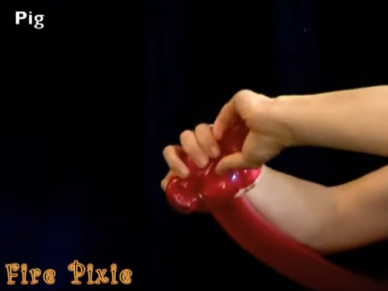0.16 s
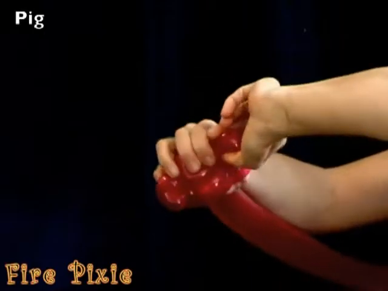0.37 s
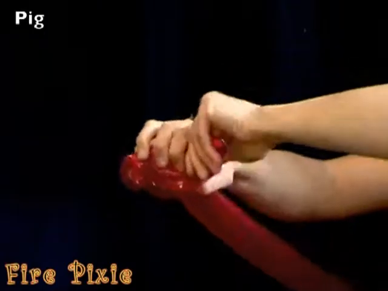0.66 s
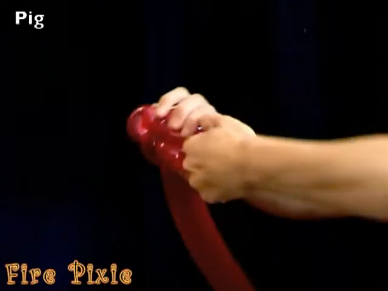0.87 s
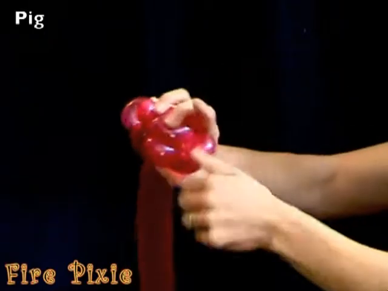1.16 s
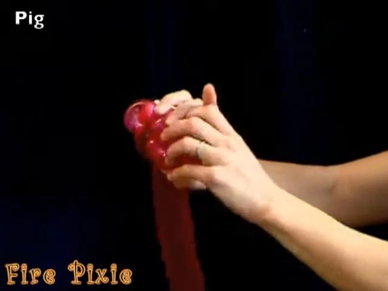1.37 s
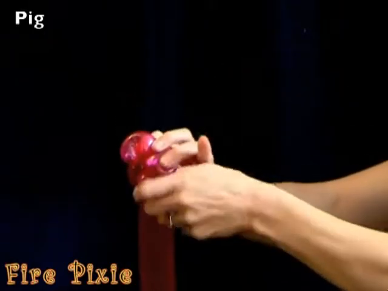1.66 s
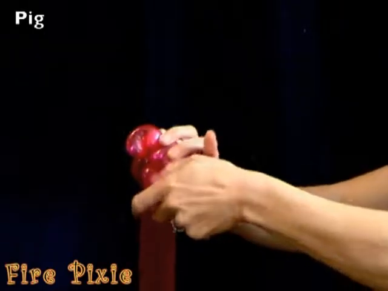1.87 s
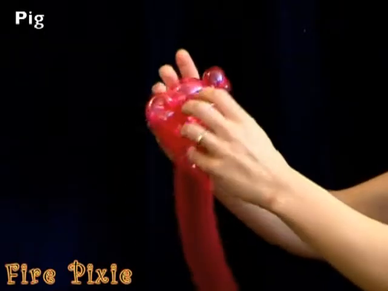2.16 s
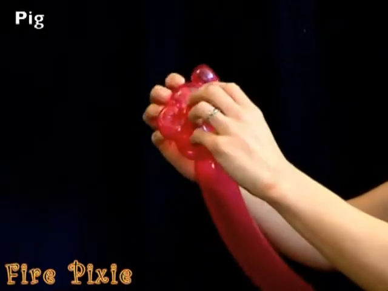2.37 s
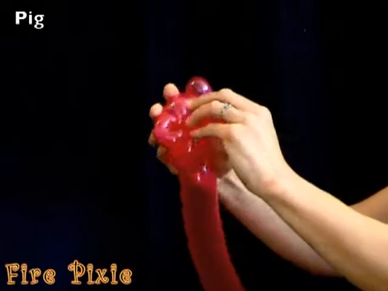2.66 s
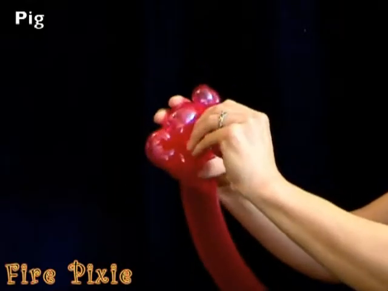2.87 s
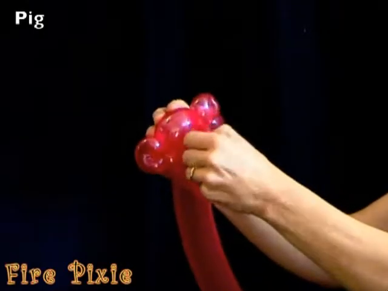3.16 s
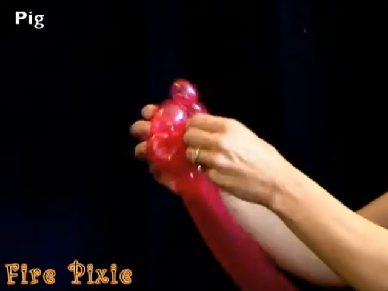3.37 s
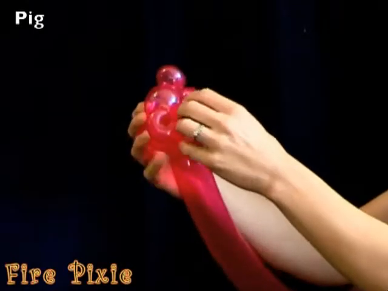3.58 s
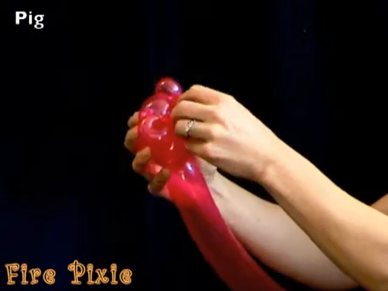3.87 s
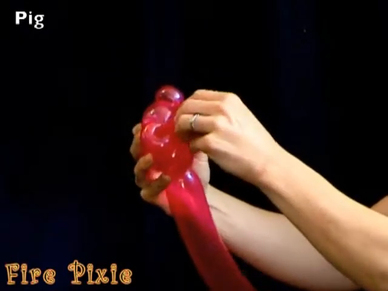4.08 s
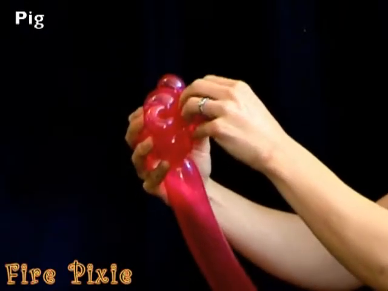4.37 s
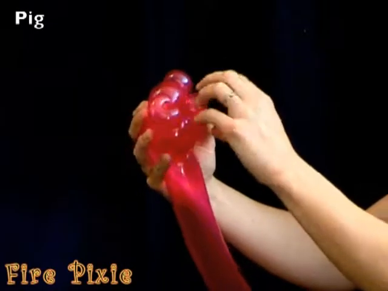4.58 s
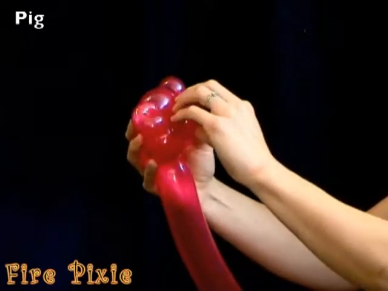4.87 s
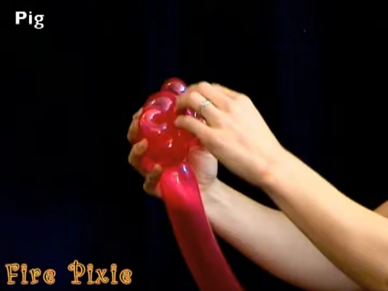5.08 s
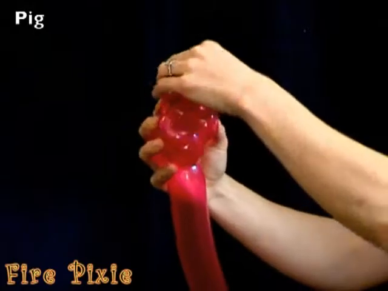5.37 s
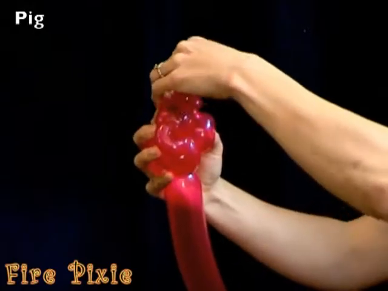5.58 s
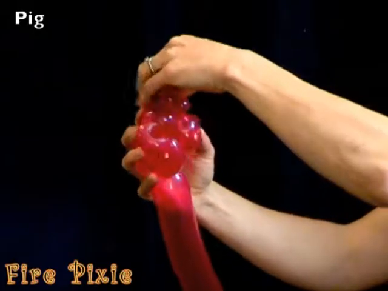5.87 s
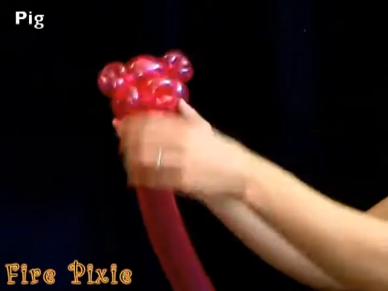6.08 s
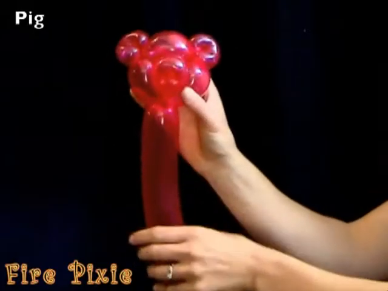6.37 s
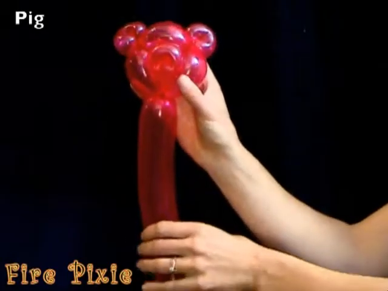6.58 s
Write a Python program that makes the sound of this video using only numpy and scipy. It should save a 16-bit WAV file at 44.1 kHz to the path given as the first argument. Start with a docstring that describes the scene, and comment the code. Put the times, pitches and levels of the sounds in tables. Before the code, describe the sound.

A taut latex balloon is twisted by hand, very close, in a small quiet room with a short reverberant tail and faint low room tone. From 0 to 1 s, rubbing comes in quick overlapping strokes, crackly and bright, with hollow bubble thuds around 0.2 and 0.8 and a cluster of hard snaps near 0.95. A tiny creak follows at 1.0, then lighter rubbing with isolated strong snaps around 1.3, 1.6, 1.8 and 2.15. It quiets around 2.3, then swells into dense rubbing and rapid snaps at 2.9-3.2, followed by short stuttering creaks to 3.5. From 3.9 to 5.1, rubbing alternates with faint creaks, with a sharp snap and thud near 4.15. A stroke at 5.4 leads into a thick snapping flurry at 5.5-5.8, capped by the loudest crack at 5.82. Afterwards only weak rubs and ticks remain, with a small bump and snap at 6.56.

```python
"""Stick-slip friction on a latex balloon

Fingers twist a balloon close by in a small quiet room. The rubber sticks and lets go in sharp
snaps (spiked noise bursts) and short creaks (rows of near-even slips) over a crackle of dense
small slips. Squeezed bubbles thud (damped tones with noise puffs). A short tail of random-sign
taps and a faint room tone (coloured noise) surround the balloon.
"""
import sys
import numpy as np
from scipy import signal
from scipy.fft import rfft, irfft, next_fast_len
from scipy.io import wavfile
from scipy.ndimage import uniform_filter1d

SR = 44100
rng = np.random.default_rng(int(sys.argv[2]) if len(sys.argv) > 2 else 0)


def persist_wave(psi):
    """Save psi, clipped to +-1, as 16-bit WAV."""
    counts = np.round(np.clip(psi, -1, 1) * 32767).astype(np.int16)
    wavfile.write(sys.argv[1], SR, np.atleast_2d(counts).T)


N = 296352  # length in samples


def amp(db):
    """Decibel law: the amplitude gain of a level in dB."""
    return 10 ** (np.asarray(db) / 20)


def evened(x):
    """Power normalisation: scales a signal to rms 1."""
    return x / np.sqrt(np.mean(x ** 2) + 1e-20)


def read(points, hz):
    """Logarithmic frequency scale: interpolates a table evenly per octave."""
    f, value = np.transpose(points)
    return np.interp(np.log(hz + 1), np.log(f + 1), value)


def coloured(x, points):
    """Linear filtering: weights the spectrum of a signal by a table of levels."""
    length = x.shape[-1]
    size = next_fast_len(length)
    gain = amp(read(points, np.fft.rfftfreq(size, 1 / SR)))
    return irfft(rfft(x, size) * gain, size)[..., :length]


def add(mix, s, sound):
    """Superposition: adds a sound into the mix at time s in seconds."""
    part = mix[max(round(s * SR), 0):][:len(sound)]
    part += sound[:len(part)]


# Faint room tone, spectral shape only: [f/Hz, level/dB]
ROOM_TONE = [(20, -41), (60, 0.5), (110, -6), (220, -6), (500, -9), (1000, -55), (6000, -75.5),
             (16000, -50)]
ROOM_TONE_DB = -65  # rms


def room_tone():
    """Stationary noise: a steady random signal is described by its spectrum and rms level."""
    return amp(ROOM_TONE_DB) * evened(coloured(rng.standard_normal(N), ROOM_TONE))


# Strokes of the fingers over the rubber:
# [start t/s, rise/s, hold/s, crackle level/dB, air in the bubbles against crackle/dB]
STROKES = [(-.01, 0.0046, 0.014, -39.5, -10.5), (0.03, .01, 0.089, -32.5, -8.5),
           (0.148, 0.055, 0.056, -29, -7), (0.28, 0.011, 0.12, -34, -16.5),
           (0.428, 0.031, 0.059, -33, -9.5), (0.533, 0.025, 0.11, -29.5, -12.5),
           (0.683, 0.026, .11, -26, -14.5), (0.863, 0.047, 0.15, -31, -12), (1, .01, 0.018, -49, -28),
           (1.148, 0.037, .05, -39, -8), (1.233, .02, 0.016, -32, -8.5), (1.45, 0.022, 0.11, -43.5, -5),
           (1.534, .01, 0.1, -39, -30), (1.688, 0.014, 0.0093, -37, -15), (1.742, 0.0066, 0.23, -38.5, -15),
           (1.978, 0.038, 0.17, -37.5, -4.5), (2.253, .02, .04, -53.5, 3.5), (2.312, 0.15, .08, -38.5, -7),
           (2.555, 0.035, 0.12, -37, -8), (2.664, 0.028, 0.055, -30.5, -14), (2.816, 0.092, 0.012, -29, -9),
           (2.961, 0.033, 0.051, -27, -4), (3.09, 0.022, 0.2, -33, -6.5),
           (3.356, 0.015, 0.051, -40.5, -1.5), (3.443, 0.03, 0.005, -29, -8), (3.536, 0.022, .07, -47, 2),
           (3.609, 0.012, 0.12, -44.5, -9), (3.777, .02, 0.063, -58.5, 7.5), (3.886, .11, 0.009, -27, -11),
           (4.032, 0.022, 0.14, -31, -11.5), (4.124, 0.024, 0.082, -28.5, -14),
           (4.278, 0.072, 0.12, -39, -9), (4.423, 0.056, 0.048, -32, -11), (4.57, .02, 0.043, -45.5, -4),
           (4.687, 0.015, 0.11, -46, -2), (4.857, 0.0074, 0.038, -34.5, -6.5),
           (4.987, 0.0083, 0.13, -34, -4.5), (5.152, 0.019, 0.042, -32, -10.5),
           (5.413, 0.0044, 0.01, -23, -18), (5.487, 0.042, 0.21, -31.5, -12), (5.81, 0.0083, 0.03, -31, -9),
           (5.9, 0.017, 0.1, -36, -17.5), (6.053, 0.0071, 0.056, -47.5, -5.5), (6.193, .015, .03, -50, -9),
           (6.31, 0.0074, 0.011, -58, 2), (6.43, .02, .05, -66, -13), (6.491, 0.0049, 0.0081, -50, -5),
           (6.563, 0.0078, 0.013, -44.5, -2)]
TOUCH_DB = -20.5  # a stroke starts this far under its level


def stroked(db, fall_db_per_s):
    """Power addition: strokes rise, hold and release, and overlapping ones add in power."""
    start, rise, hold = np.transpose(STROKES)[:3, :, None]
    t = np.arange(0, N / SR + .002, .001) - start  # 1 ms grid, from each start
    rising_db = TOUCH_DB * np.clip(1 - t / np.maximum(rise, .002), 0, 1)
    falling_db = -fall_db_per_s * np.maximum(t - rise - hold, 0)
    gains = amp(db[:, None] + rising_db + falling_db) * (t >= 0)
    gain = np.sqrt((gains ** 2).sum(0))
    return np.interp(np.arange(N) / SR, t[0] + start[0], gain)


# Spectral shape of the taut latex, also heard in every slip: [f/Hz, level/dB]
SKIN = [(150, -49), (700, -12), (1600, 1), (2600, -1), (4300, -1), (6500, 0.5), (8000, -3), (10000, -7),
        (12000, -8), (14500, -19.5), (17000, -57)]
# Spectral shape of the air in the bubbles: [f/Hz, level/dB]
AIR = [(30, -11.5), (100, -10), (220, 1.5), (450, 5), (800, 4.5), (1300, -7), (2500, -22)]
# Spectral shape of the top of the crackle: [f/Hz, level/dB]
FIZZ = [(6000, -77), (8500, 5.5), (10500, 8.5), (13000, -1.5), (16000, -63)]
FIZZ_DB = -14  # fizz of the skin against the crackle
SKIN_FALL, AIR_FALL, FIZZ_FALL = 197, 178, 240  # release after the hold, dB per s


def rubbing(per_s=400., spread_db=3.0, hiss=1.0, air_hiss=1.76, fizz_hiss=0.2, patchy_db=3.):
    """Random slip friction: dense uneven slips over a smooth scrape drive both skin and air."""
    level_db, air_db = np.transpose(STROKES)[3:]
    skin_gain = stroked(level_db, SKIN_FALL)
    air_gain = stroked(level_db + air_db, AIR_FALL)
    fizz_gain = stroked(level_db + FIZZ_DB, FIZZ_FALL)

    size = amp(spread_db * np.minimum(rng.exponential(1, N), 3))
    impulses = size * (rng.random(N) < per_s / SR)
    decay = np.exp(-np.arange(200) / (.5 * SR / 1000))  # time constant 0.5 ms
    slipping = evened(signal.oaconvolve(impulses, decay)[:N])
    noise = rng.standard_normal(N)

    # the fizz takes over from the skin at the top
    dull_skin = [(hz, db) for hz, db in SKIN if hz < 9000] + [(11000, -40), (16000, -60)]
    skin = evened(coloured((slipping + hiss) * noise, dull_skin))
    air = evened(coloured((slipping + air_hiss) * noise, AIR))
    fizz = evened(coloured((slipping + fizz_hiss) * noise, FIZZ))
    crackle = skin_gain * skin + air_gain * air + fizz_gain * fizz

    # the contact wanders over bubbles of different tension, so the colour comes in patches
    z = signal.stft(crackle, nperseg=256)[2]
    patches = uniform_filter1d(rng.standard_normal(z.shape), size=5, axis=0)
    patches = uniform_filter1d(patches, size=8, axis=1)
    patch_gain = amp(patchy_db * evened(patches) - 4.0)  # trims the stroke levels by 4 dB
    return signal.istft(z * patch_gain, nperseg=256)[1][:N]


# Thuds of squeezed bubbles, level before the envelope: [t/s, level/dB, f/Hz]
THUDS = [(0.024, -14, 670), (0.112, -39, 647), (0.186, -13, 770), (0.247, -8, 720), (0.466, -26.5, 338),
         (0.756, -25.5, 325), (0.78, -8, 890), (2.083, -21.5, 570), (2.141, -18, 400), (2.452, -27.5, 446),
         (2.534, -17, 695), (2.997, -28, 400), (3.167, -23, 400), (3.553, -27.5, 244), (3.645, -37, 201),
         (4.154, -15, 680), (4.997, -36, 380), (5.247, -25, 570), (5.417, -26.5, 620), (5.553, -25.5, 570),
         (5.814, -23, 636), (6.21, -37.5, 318), (6.496, -38, 237), (6.558, -20, 750)]


def thuds(cycles=3., rise_ms=1.5, width=1.6):
    """Damped resonance: a dull puff around and below the pitch; low bubbles ring clearer."""
    out = np.zeros(N)
    t = np.arange(3000) / SR
    f = np.fft.rfftfreq(3000, 1 / SR)
    noises = rng.standard_normal((len(THUDS), 3000))
    for (s, db, hz), noise in zip(THUDS, noises):
        below, above = (hz / (f + 1)) ** 1.5, (f / hz / width) ** 3
        puff = evened(irfft(rfft(noise) / (1 + below + above)))
        ring = 170 / hz * np.sin(2 * np.pi * hz * t)
        rise = 1 - np.exp(-t * 1000 / rise_ms)
        decay = np.exp(-t * hz / cycles)  # time constant in cycles of the pitch
        add(out, s, amp(db) * (ring + .5 * puff) * rise * decay)
    return out


def slips(hz, ms, octaves=0.89, focus_db=10.5, rattle=0.28, clumps_db=4.):
    """Stick-slip release: each row is a spike and a weaker rattle of the skin, brightest near hz."""
    lead, rise_ms, spike = 64, .14, .11  # samples before the release; ms; share of ms
    rattle_db, longest_ms = -14, 2.6
    t = (np.arange(1024) - lead) / SR * 1000  # ms
    onset = np.exp(np.minimum(t, 0) / rise_ms)  # the rubber starts to creep just before it lets go
    t = np.maximum(t, 0)
    ms = np.maximum(ms, .3)[:, None]

    noise = rng.standard_normal((len(hz), 1024))
    after_slips = uniform_filter1d(rng.standard_normal(noise.shape), size=24, axis=1)
    clumps = amp(clumps_db * evened(after_slips))
    sharp = np.sign(noise) * np.exp(-t / (spike * ms))
    rattling = amp(rattle_db) * clumps * noise * np.exp(-rattle * t / np.minimum(ms, longest_ms))
    burst = (sharp + rattling) * onset

    f = np.fft.rfftfreq(1024, 1 / SR)
    distance = np.log2((f + 1) / hz[:, None]) / octaves
    focus = focus_db * np.exp(-.5 * distance ** 2)
    out = irfft(rfft(burst) * amp(read(SKIN, f) + focus))
    # level 0 dB is the loudest running power over 20 samples
    top = uniform_filter1d(out ** 2, 20, axis=1).max(1, keepdims=True)
    return out / np.sqrt(top), lead / SR


# Clear snaps of rubber letting go: [t/s, level/dB, centre f/Hz]
SNAPS = [(0.0289, -15, 4250), (.043, -18, 4170), (0.1213, -15.5, 4760), (0.1946, -8.5, 4500),
         (0.2432, -14.5, 4700), (0.2565, -14, 3700), (0.3496, -21.5, 5460), (0.4093, -26, 4480),
         (0.4416, -11, 4940), (0.4603, -8, 6550), (0.487, -26, 5000), (.5225, -22, 4970),
         (0.5653, -19, 4400), (0.5727, -17, 5400), (0.6232, -16.5, 5200), (.7094, -14, 5000),
         (0.717, -13, 5300), (0.727, -21, 4500), (0.7834, -12.5, 3160), (0.816, -11, 4100),
         (0.8873, -19.5, 5930), (.937, -5.5, 4770), (0.9406, -16, 4000), (0.95, -7, 5700),
         (0.9702, -8, 4900), (1.0712, -12, 5460), (1.1686, -23.5, 4450), (1.1855, -22, 6200),
         (1.192, -18, 6400), (1.236, -20, 6000), (1.2534, -14.5, 4500), (1.268, -12, 5430),
         (1.2776, -7.5, 6370), (1.4257, -37.5, 6530), (1.5426, -11.5, 5740), (1.556, -14, 5200),
         (1.571, -1.5, 6400), (1.575, -13.5, 5070), (1.715, -26.5, 4670), (1.7498, -6, 3520),
         (1.7534, -24, 4100), (1.765, -23, 4500), (1.774, -21, 4630), (1.7998, -8.5, 5130),
         (1.818, -15.5, 6200), (1.827, -20, 5300), (1.8587, -7, 6030), (1.9863, -20, 6400),
         (2.0674, -24, 4300), (2.087, -12.5, 3800), (2.127, -38, 6500), (2.146, -6, 5560),
         (2.367, -31, 4300), (2.461, -31.5, 3480), (2.5242, -19, 5500), (2.546, -23.5, 2900),
         (2.5882, -23.5, 4500), (2.6267, -17, 5440), (2.949, -24, 5700), (2.9883, -17, 4600),
         (2.9968, -11.5, 4470), (3.0077, -14, 5240), (3.0184, -14, 4940), (3.028, -8, 5200),
         (3.037, -9.5, 5400), (3.046, -16, 5000), (3.0655, -12, 5630), (3.082, -16, 5700),
         (3.1048, -12, 6900), (3.1385, -15, 6500), (3.1419, -6.5, 6700), (3.1675, -20, 4900),
         (3.1735, -18, 4930), (3.2199, -17.5, 4900), (3.3669, -20.5, 6400), (3.3819, -14, 6550),
         (3.395, -21, 5800), (3.412, -14.5, 6200), (3.493, -13, 4740), (3.528, -20, 5930),
         (3.652, -24.5, 4340), (3.736, -28.5, 4570), (3.9029, -33.5, 4700), (4.153, -16, 5200),
         (4.1635, -5, 4000), (4.23, -19, 5170), (4.298, -23, 4600), (4.331, -22.5, 6200),
         (4.3703, -15.5, 6130), (4.3873, -23, 5600), (4.4793, -26, 5270), (4.548, -25.5, 5850),
         (5.124, -21, 3500), (5.1585, -14.5, 5140), (5.219, -18, 4430), (5.2491, -22, 5130),
         (5.254, -19.5, 5000), (5.4157, -13.5, 5400), (5.456, -18, 5200), (5.492, -18, 6300),
         (5.5074, -17.5, 6000), (5.5126, -13, 5800), (5.5611, -13, 6600), (5.579, -18.5, 5840),
         (5.5932, -20.5, 5600), (5.642, -19.5, 5000), (5.6506, -8, 6500), (5.672, -9.5, 6050),
         (5.688, -12, 5900), (5.6922, -16, 5500), (5.701, -14, 6000), (5.7085, -7.5, 6300),
         (5.711, -12.5, 5500), (5.733, -10, 5030), (5.777, -18.5, 4960), (5.821, 4, 5100),
         (5.8537, -15.5, 5000), (5.925, -22, 5400), (6.057, -27, 4800), (6.072, -34, 4800),
         (6.0934, -29, 4800), (6.2364, -30.5, 3140), (6.3108, -42.5, 2900), (6.3251, -37.5, 3580),
         (6.4224, -37.5, 5300), (6.5609, -13, 4500), (6.5765, -21.5, 4580)]
SNAP_MS, MS_PER_DB = 1, 0.06  # nominal length at 0 dB, and growth per dB below it
SNAP_SPREAD = .2  # random spread of the length, octaves


def snaps():
    """Elastic release: a hard snap is short, a weak one drags, and each has its own colour."""
    s, db, hz = np.transpose(SNAPS)
    spread = 2 ** (SNAP_SPREAD * rng.standard_normal(len(s)))
    sounds, lead = slips(hz, (SNAP_MS - MS_PER_DB * db) * spread)
    out = np.zeros(N)
    for at, level_db, sound in zip(s, db, sounds):
        add(out, at - lead, amp(level_db) * sound)
    return out


# Tail decay: [f/Hz, t60/s]
ROOM = [(200, 0.44), (600, 0.24), (1500, 0.43), (4000, 0.4), (10000, 0.34)]


def room(x, gap_ms=2.15):
    """Exponential reverberation: bands of random-sign taps each die at their own speed.

    Moving hands fade between four such tails, seven rounds a second.
    """
    shape = (2, 4, SR // 2)
    taps = rng.choice([-1., 1.], shape) * (rng.random(shape) < .1)
    hz, t, z = signal.stft(taps, SR, nperseg=256)
    decay = amp(-60 * t / read(ROOM, hz)[:, None])
    tail = signal.istft(z * decay, SR, nperseg=256)[1]
    # silent for one gap, then fades in over another
    tail *= np.clip(np.arange(tail.shape[2]) / SR * 1000 / gap_ms - 1, 0, 1)
    tail /= np.linalg.norm(tail[0, 0])
    turn = 2 * np.pi * (7 * np.arange(N) / SR + np.arange(4)[:, None] / 4)
    shares = x * np.maximum(np.cos(turn), 0)  # squares of the four fades sum to one
    return signal.fftconvolve(shares[None], tail, axes=2).sum(1)[:, :N]


# Creaks, rows of near-even slips:
# [first slip t/s, end t/s, slips per s at start, at end, level/dB, centre f/Hz, bubble ring f/Hz]
CREAKS = [(1.012, 1.049, 170, 180, -14.5, 6400, 6100), (2.893, 2.921, 152, 160, -20, 2500, 1240),
          (3.189, 3.205, 110, 75, -20.5, 4500, 1890), (3.231, 3.278, 110, 78, -22, 5050, 1870),
          (3.291, 3.329, 135, 130, -21, 5330, 1730), (3.455, 3.512, 150, 200, -23.5, 4600, 2250),
          (3.96, 3.989, 110, 230, -41, 3730, 1570), (4.032, 4.092, 115, 87, -21, 4640, 1540),
          (4.42, 4.499, 112, 146, -26.5, 4640, 1500), (4.606, 4.661, 130, 190, -37.5, 5000, 1490),
          (4.698, 4.755, 124, 150, -40.5, 4900, 1480), (4.752, 4.817, 74, 73, -34, 3870, 1750),
          (4.869, 4.91, 174, 64, -29, 3650, 1520), (4.997, 5.115, 168, 156, -24.5, 3800, 1870),
          (5.517, 5.578, 112, 142, -19, 5900, 2510), (6.107, 6.131, 74, 230, -30, 4330, 2540)]


def creaks(ms=.55, spread_db=1.5, ring_db=-9., t60=.014):
    """Relaxation oscillation: under steady pull one spot slips at a nearly even pace.

    The pace drifts with the tension and the bubble rings along; a row has at most 16 slips.
    """
    out = np.zeros(N)
    t = np.arange(1024) / SR
    for start, end, first, last, db, hz, ring_hz in CREAKS:
        sounds, lead = slips(np.full(17, hz), np.full(17, ms))
        after = t - lead
        ring = amp(ring_db - 60 * np.abs(after) / t60) * np.sin(2 * np.pi * ring_hz * after) * (after > 0)
        common = sounds[0]
        s = start
        for own, (louder, later) in zip(sounds[1:], rng.standard_normal((16, 2))):
            if s < end:
                slip = 0.75 * common + 0.74 * own + ring
                add(out, s - lead, amp(db + spread_db * louder) * slip)
                s += (1 + .04 * later) / np.interp(s, [start, end], [first, last])
    return out


# Gain of the side signal of the tail: [f/Hz, level/dB]
WIDE = [(250, -56), (700, -39.5), (2800, -30), (6000, -20.5), (14000, -23)]


def scene():
    """Mid-side stereo: the balloon stands in the middle and only its room tail has width."""
    balloon = rubbing() + thuds() + snaps() + creaks()
    mid_tail, side_tail = room(balloon)
    mid = balloon + amp(-11.5) * mid_tail + room_tone()
    side = coloured(side_tail, WIDE)
    return np.array([mid + side, mid - side])


EDGE_HZ = 16800  # upper band limit


def record(dry):
    """Soft saturation and band limiting: tanh rounds the loudest peaks, then a low-pass acts."""
    ceiling = .9
    rounded = ceiling * np.tanh(dry / ceiling)
    low_pass = signal.firwin(511, EDGE_HZ, window=("kaiser", 9), fs=SR)
    return signal.oaconvolve(rounded, low_pass[None], "same")


dry = scene()
out = record(dry)
persist_wave(out)
```